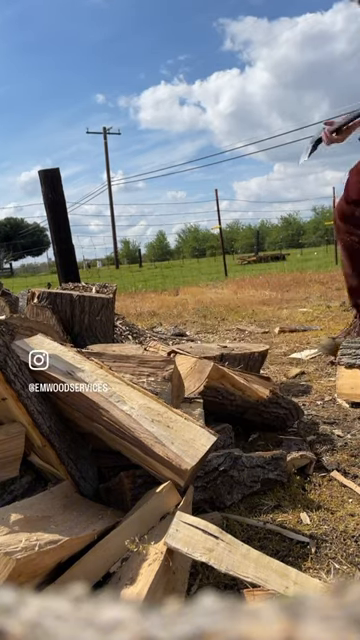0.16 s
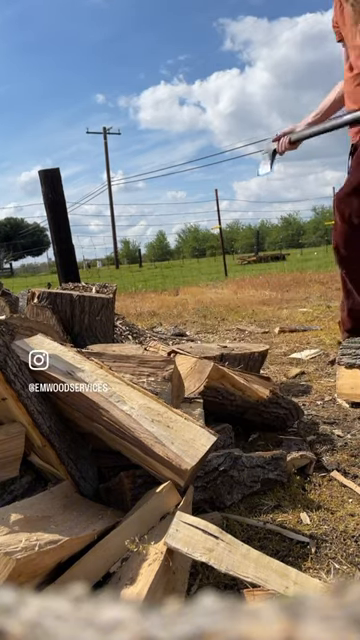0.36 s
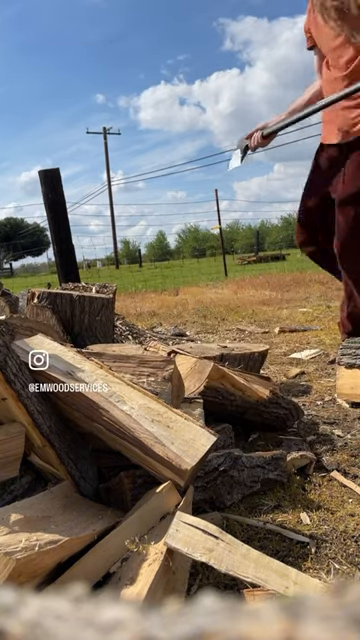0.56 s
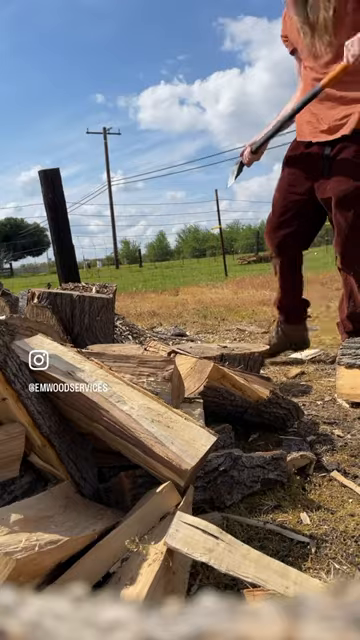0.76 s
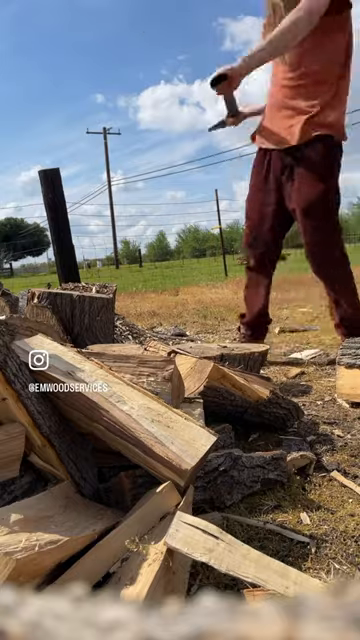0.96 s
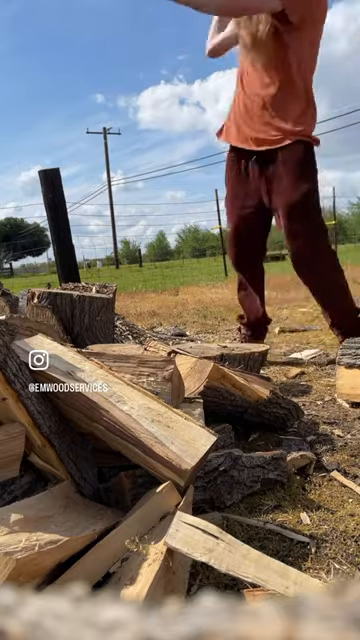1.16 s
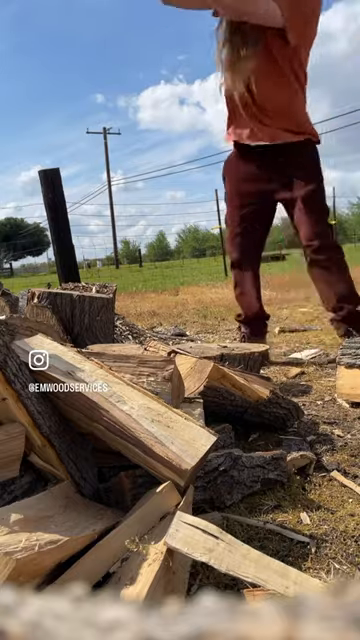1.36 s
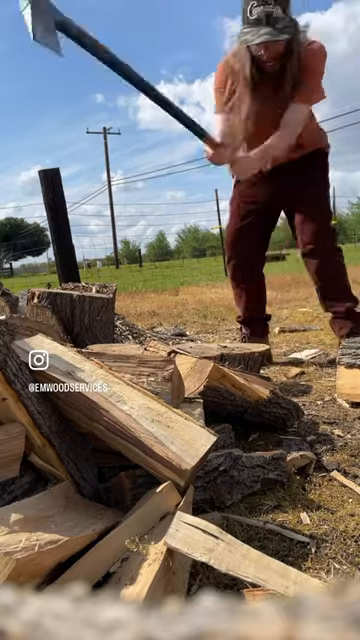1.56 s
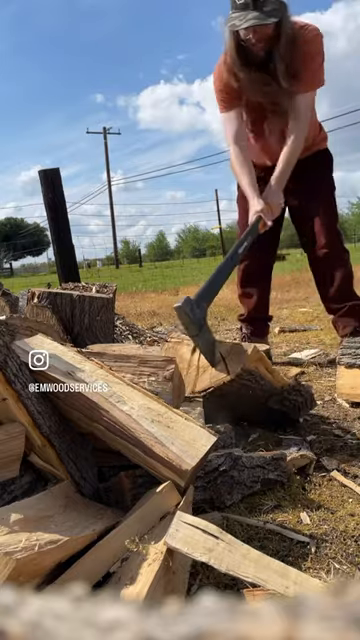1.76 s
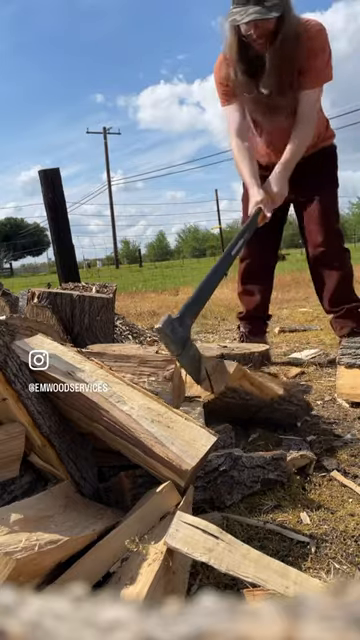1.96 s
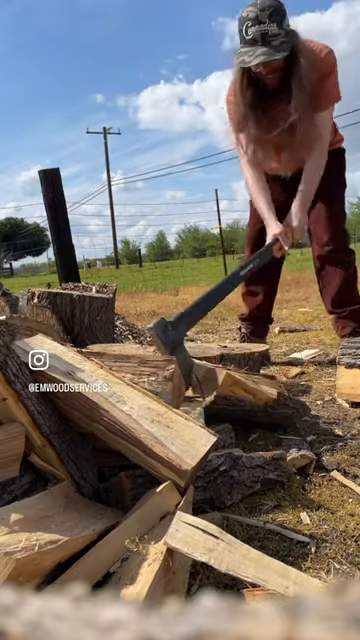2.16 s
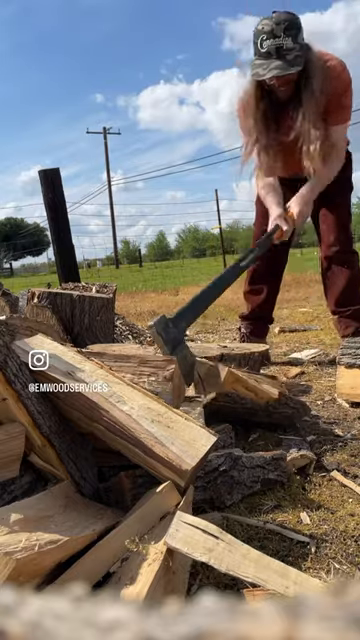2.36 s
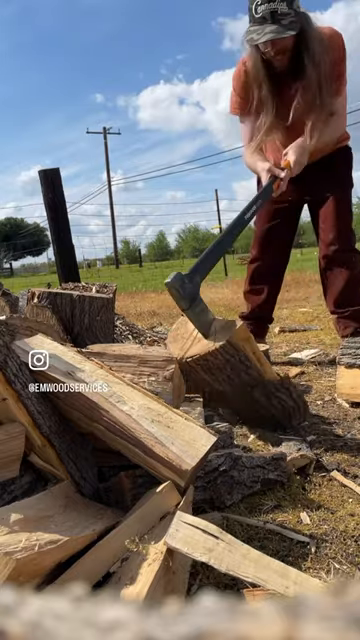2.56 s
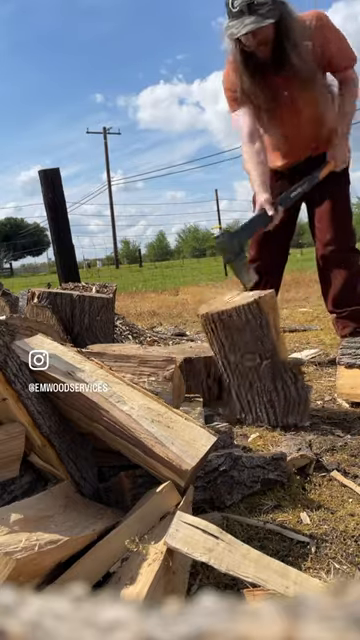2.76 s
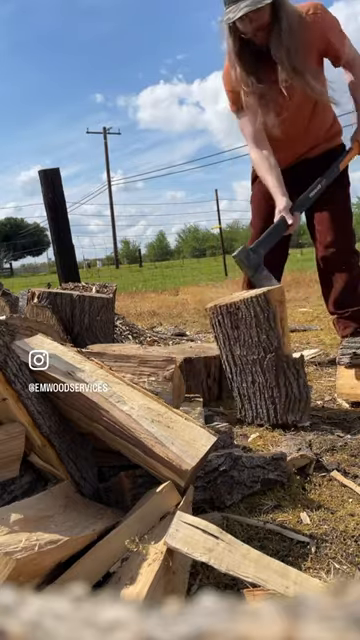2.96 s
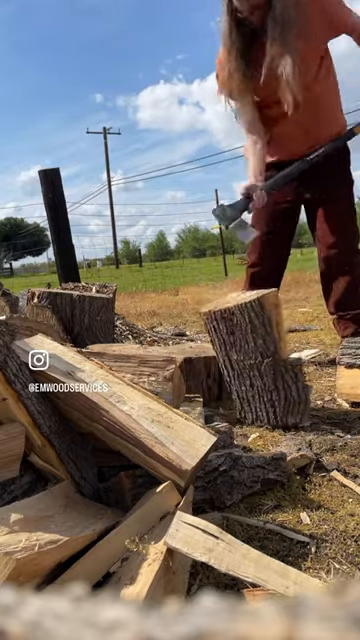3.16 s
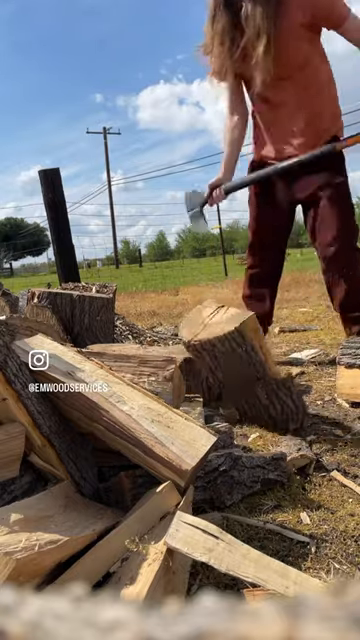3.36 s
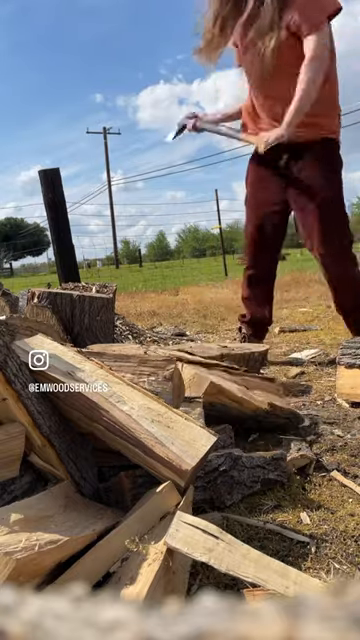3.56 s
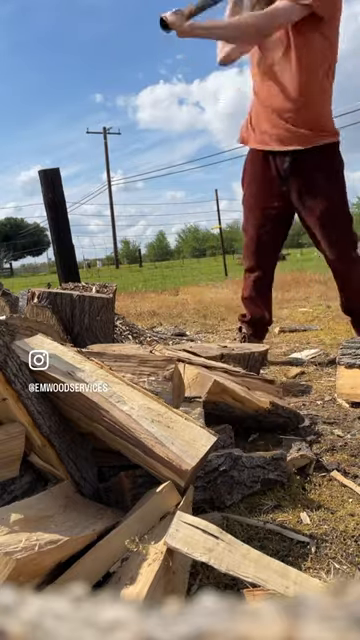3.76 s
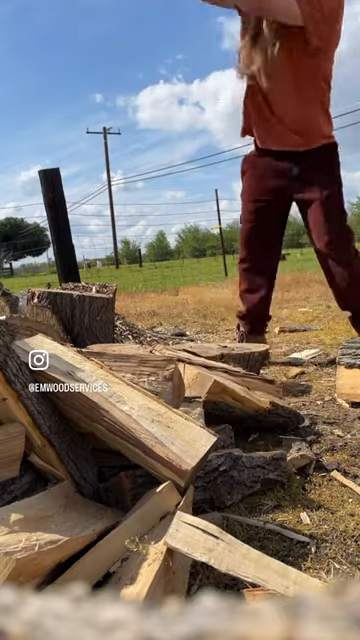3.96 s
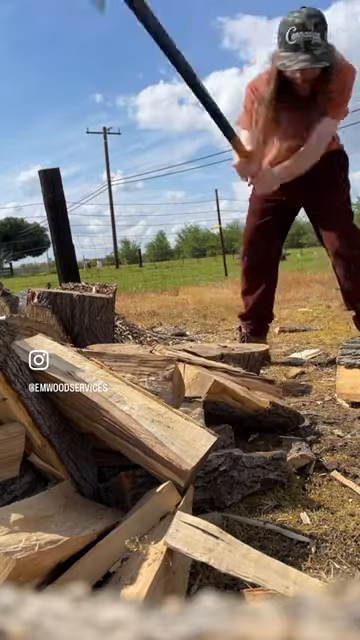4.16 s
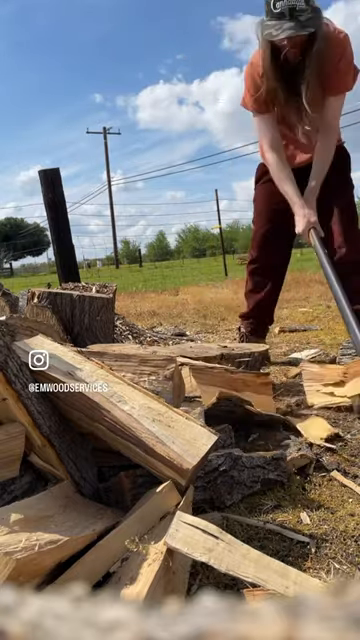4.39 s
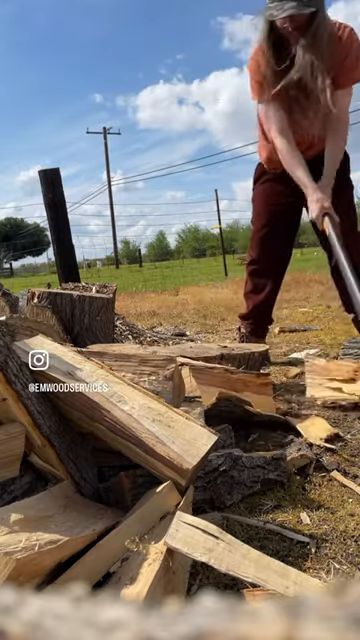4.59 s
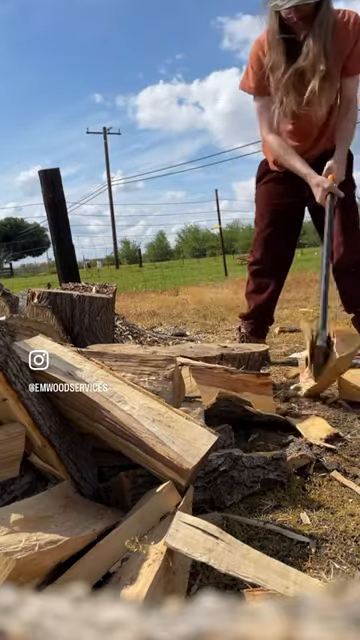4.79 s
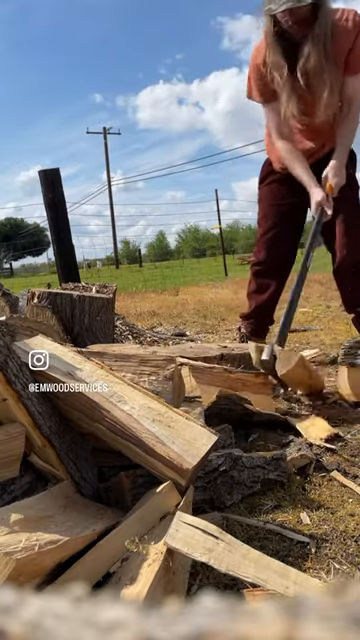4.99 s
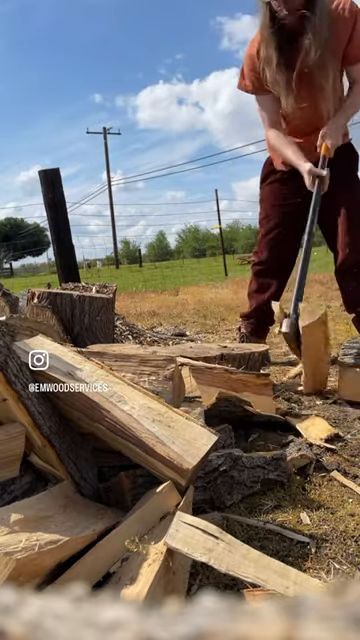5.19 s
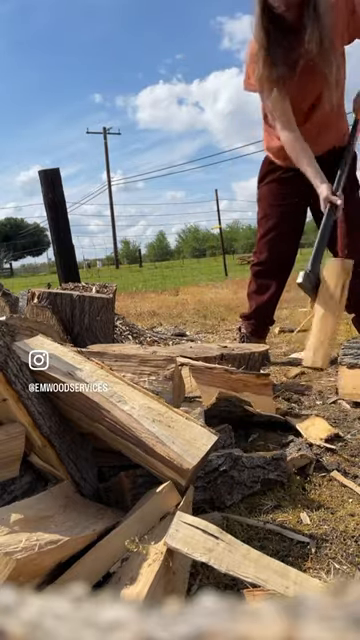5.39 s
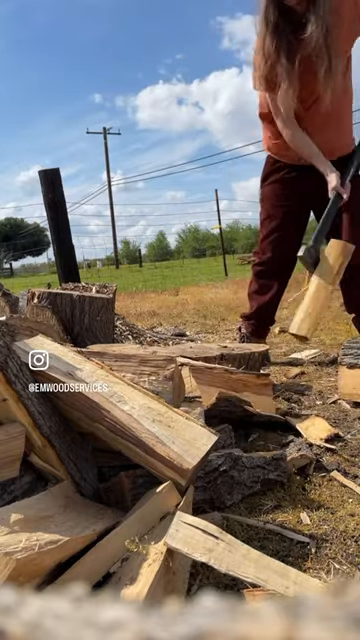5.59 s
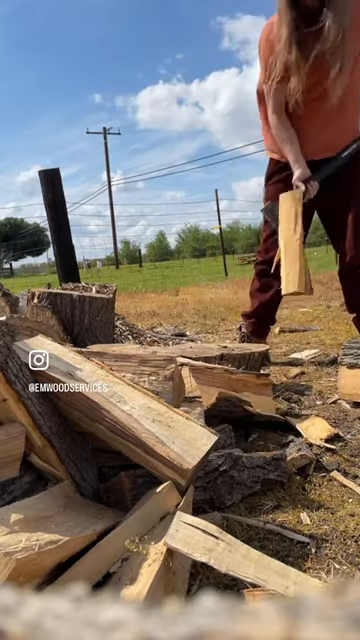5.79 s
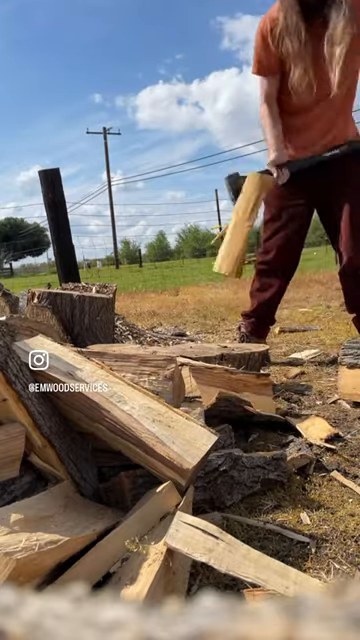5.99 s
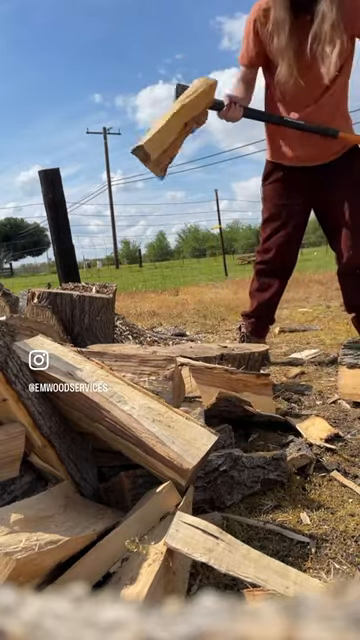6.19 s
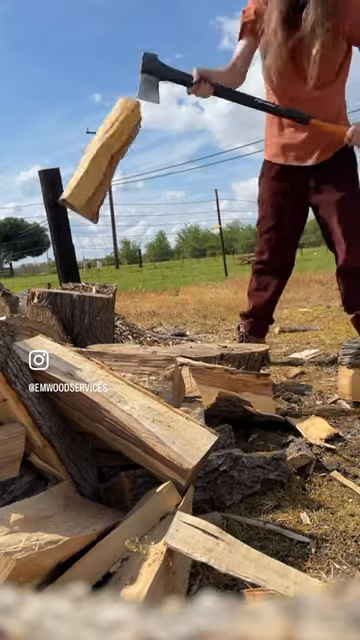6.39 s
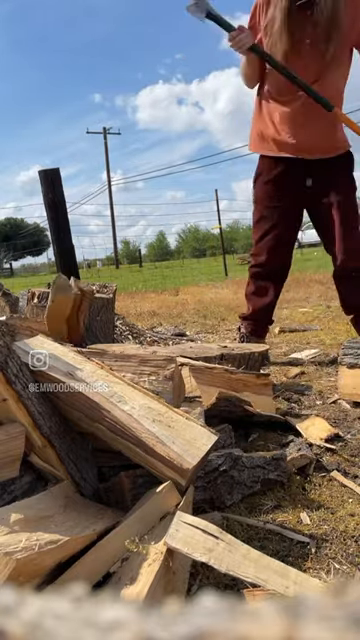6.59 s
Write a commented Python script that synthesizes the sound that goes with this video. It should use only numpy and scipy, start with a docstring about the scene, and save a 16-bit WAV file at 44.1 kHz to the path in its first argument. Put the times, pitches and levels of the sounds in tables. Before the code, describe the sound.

An axe cracks wooden rounds close by in an open field while a heavy vehicle's low rumble swells and passes behind.

```python
"""An axe splits wood rounds in an open field, close to a two-port microphone: bursts of fibre snaps
drive the modes of the wood, with body thumps, tears, knocks, dry tocks and squeaks around them.
Some way off a heavy vehicle revs up and rumbles past: bands of noise, engine orders and a gear whine.
Cloth swishes as shaped noise, a small bird warbles in gliding sines; air hiss and a field murmur lie behind.
"""
import sys
import numpy as np
from scipy import signal
from scipy.io import wavfile

SR = 44100
rng = np.random.default_rng(int(sys.argv[2]) if len(sys.argv) > 2 else 0)


def boost_factor(decibels):
    """Convert a level in decibels to a linear amplitude factor."""
    exponent = np.asarray(decibels, float) / 20
    return 10 ** exponent


def digitize_waveform(pressure):
    """Quantize a signal to 16-bit integers and store it at the path in sys.argv[1].

    Rows of a 2-D input are taken as channels; values are limited to [-1, 1].
    """
    field = np.atleast_2d(pressure).T
    bounded = np.clip(field, -1, 1)
    quanta = np.round(bounded * 32767).astype(np.int16)
    wavfile.write(sys.argv[1], SR, quanta)


N = 292734
SIDES = np.array([[1], [-1]])   # left, right
SNAP_FROM_HZ = 4200   # sharp snaps of the wood and fine hiss of the air lie above this

# likeness of the two ports in air hiss and cloth, held within -1 to 1: (frequency [Hz], likeness)
AIR_LIKENESS = [(1000, 0.59), (3300, -0.1), (5500, 0.55), (6600, 0.19), (7200, -1.8), (8200, -1.51),
                (9000, 0.25)]
# nearly centred balance of the diffuse sounds: (frequency [Hz], left over right [dB])
CENTRED = [(30, 0.04), (9000, 0.025)]


def rms_one(x):
    """Scale to unit rms."""
    return x / np.sqrt(np.mean(x ** 2) + 1e-20)


def in_time(rows):
    """Each column of a curve table, sample by sample."""
    s, *columns = np.transpose(rows)
    return [np.interp(np.arange(N) / SR, s, c) for c in columns]


def at_hz(points, hz):
    """Read a spectrum on a log-frequency axis."""
    return np.interp(np.log(hz), np.log(np.array(points)[:, 0]), np.array(points)[:, 1])


def drift(rate):
    """Slow random wander of unit rms: twice-smoothed noise on every 40th sample, joined by lines."""
    r = np.exp(-80 * np.pi * rate / SR)
    white = rng.standard_normal(N // 40 + 2002)
    slow = signal.lfilter([1], [1, -2 * r, r * r], white)[2000:]
    return np.interp(np.arange(N) / 40, np.arange(len(slow)), rms_one(slow))


def ring(drive, hz, t60):
    """A damped resonance: a unit click sets a sine of height 1 ringing."""
    r, w = boost_factor(-60 / (t60 * SR)), 2 * np.pi * hz / SR
    return signal.lfilter([0, np.sin(w)], [1, -2 * r * np.cos(w), r * r], drive + 1e-18)


def turbulence(colour, splits_hz, likeness, balance, patchy_db, flicker_per_s, edges):
    """Bands of flickering stereo noise, summed between the splits, each part rms 1."""
    parts = np.zeros((len(splits_hz) + 1, 2, N))
    together = drift(flicker_per_s)
    white = rng.standard_normal((2, 2, N))      # neighbouring bands get unrelated noise
    for k, (low, high) in enumerate(zip(edges, edges[1:])):
        band = signal.butter(2, [low, high], "band", fs=SR, output="sos")
        mid, side = signal.sosfilt(band, white[k % 2])
        hz = np.sqrt(low * high)
        alike = np.clip(at_hz(likeness, hz), -1, 1)
        pair = np.sqrt(1 + alike) * mid + np.sqrt(1 - alike) * side * SIDES
        flicker_db = patchy_db * (0.89 * together + drift(flicker_per_s))
        gain = boost_factor(at_hz(colour, hz) + flicker_db)
        parts[np.searchsorted(splits_hz, hz)] += gain * pair * boost_factor(at_hz(balance, hz) / 2 * SIDES)
    return [rms_one(p) for p in parts]


def harmonics(curve, orders, waver_db):
    """Sines on multiples of a moving rate, each wavering in level."""
    hz, db = in_time(curve)
    turns = np.cumsum(hz * (1 + .004 * drift(8.0))) / SR      # the speed hunts a little
    stack = np.zeros(N)
    for k, order_db in orders:
        level = boost_factor(order_db + waver_db * drift(20.5))
        stack += level * np.sin(2 * np.pi * (k * turns + rng.random()))
    return np.sqrt(2) * boost_factor(db) * stack


def glides(notes):
    """Near-sine notes that leave their first pitch slowly, with soft edges and a fluttering level."""
    out, t = np.zeros(N), np.arange(N) / SR
    flutter = boost_factor(2.2 * drift(80))
    wobble_hz = 30 * drift(150)   # the pitch is not steady
    for s, length_s, from_hz, to_hz, db in notes:
        done = np.clip((t - s) / length_s, 0, 1)
        hz = from_hz + (to_hz - from_hz) * done ** 1.6 + wobble_hz
        envelope = np.abs(np.sin(np.pi * done)) ** .5 * (done < 1)
        out += np.sqrt(2) * boost_factor(db) * envelope * np.sin(2 * np.pi * np.cumsum(hz) / SR)
    return out * flutter * boost_factor(.6 * SIDES)


def contacts():
    """Every crack: each heavy blow, three tears that weaken on average, then the single knocks."""
    # heavy blows: (time [s], level [dB], thud [dB rel], snap [dB rel], favoured ring [Hz],
    # fading of the tears [dB/s], favoured thud [Hz])
    blows = [(1.491, -6.5, 9, -3, 1649, 500, 564), (3.3872, -17, 6, -8, 1377, 303, 865),
             (4.095, -4, 3, -1, 4460, 295, 1060), (6.505, -5, 1, -7.5, 1805, 498, 985)]
    # single knocks, scuffs and splinter ticks: (time [s], level [dB], thud [dB rel], snap [dB rel],
    # favoured ring [Hz], t60 [s], held to 6-70 ms when played)
    knocks = [(0.1472, -58, 29, -17, 1970, 0.0056), (0.2149, -40.5, 7.5, -6, 2170, 0.084),
              (1.2444, -48.5, 6, 28, 4500, 0.01), (1.514, -30, 18, -19, 2400, 0.028),
              (1.601, -33, -15, -12, 2250, .012), (1.712, -38, 0, 3, 1400, .011),
              (1.8144, -33.5, 6, -1, 1535, 0.01), (1.8663, -27, -9, -12, 2610, 0.05),
              (1.8863, -27, 3.5, -8, 1630, 0.078), (1.9494, -37.5, 12, 5, 5300, 0.015),
              (1.97, -40, -4, -6, 3000, 0.046), (2.165, -33, -5, -8, 2050, 0.043),
              (2.4236, -43, 25, -22, 2028, 0.01185), (3.3756, -29, -9, -13, 1659, 0.07),
              (4.101, -21, 16, -16, 2080, 0.047), (4.114, -23.5, -10, 7, 4500, 0.007),
              (4.122, -25.5, 0, -1, 3000, 0.037), (4.131, -22, 2, 0, 3720, 0.018),
              (4.143, -22.5, -16, 7, 4300, 0.014), (4.156, -28.5, -13, -5, 3500, 0.02),
              (4.1627, -27, -12, 5, 3400, 0.012), (4.195, -19.5, -16, 2.5, 3960, 0.0084),
              (4.211, -43, 26, -13, 1600, 0.011), (4.2493, -38.5, 22, -4, 1750, 0.034),
              (4.302, -21, 7, 0.5, 1560, 0.02), (4.4223, -27, -4, -27, 2160, 0.01),
              (4.828, -39, -3, 4, 1599, 0.028), (4.8787, -26, 23, 7, 2630, 0.0057),
              (6.206, -24.5, -1, -3, 2010, 0.077), (6.236, -18, 4, -17, 1700, 0.0091),
              (6.2552, -17.5, 1, -15, 2280, 0.0042), (6.332, -29, 0, -6, 2300, .07),
              (6.361, -24, 5, -12, 2000, .02), (6.478, -10, -11, -2.5, 3280, 0.013),
              (6.483, -23, -5, -19, 2830, 0.069), (6.501, -22, -10, 3, 3500, 0.016)]
    crack_s, tear_s, first_loss_db, knock_thud_hz = 0.026, 0.019, 10, 700
    rows = []
    for s, level_db, thud_db, snap_db, ring_hz, fade_db, thud_hz in blows:
        rows.append((s, level_db, thud_db, snap_db, ring_hz, crack_s, thud_hz))
        for after in .0095 * np.arange(1, 4):
            tear_db = level_db - first_loss_db - fade_db * after + 3.1 * rng.standard_normal()
            tear_thud_db, tear_snap_db = thud_db - 3.5 - 76.0 * after, snap_db - 53.0 * after
            rows.append((s + after, tear_db, tear_thud_db, tear_snap_db, ring_hz, tear_s, thud_hz))
    rows += [(*row, knock_thud_hz) for row in knocks]
    # a side for each: a little to the left on average, scattered (left over right, dB)
    return [(*row, 1 + 4 * rng.standard_normal()) for row in rows]


def wood():
    """Each contact is a dying burst of fibre snaps that drives the modes of the wood."""
    # modes of the wood: (frequency [Hz], level [dB], t60 [s])
    modes = [(300, -14, .025), (390, -13, .02), (470, -8, .018), (545, -2, .032), (660, -2, .018),
             (770, -5, .014), (900, -6, .012), (1050, -2, .013), (1250, -9, .009), (1420, -6, .008),
             (1620, -8, .007), (1950, 0, .009), (2300, -2, .006), (2640, -3, .006), (2930, 0, .008),
             (3350, -2, .005), (3750, -3, .005), (4100, -3, .004), (4600, -2, .004), (5000, -2, .004),
             (5450, 2, .004), (6000, -1, .003), (6500, -3, .003), (7300, -8, .004), (8000, -9, .004),
             (8700, -10, .004), (9400, -9, .004)]
    thud_top_hz = 1300
    no_bass = signal.butter(2, thud_top_hz, "high", fs=SR, output="sos")
    out, size = np.zeros((2, N)), SR // 5
    t = np.arange(size) / SR
    for s, level_db, thud_db, snap_db, ring_hz, t60, thud_hz, pan_db in contacts():
        tearing_s = np.clip(t60, .006, .07)
        snaps = (rng.random(size) < 9000 / SR) * boost_factor(6.6 * np.minimum(rng.exponential(1, size), 3))
        snaps = snaps * rng.choice([-1, 1], size)
        snaps[20] = 8.9      # the first contact is one hard click
        drive = snaps * boost_factor(-60 * (t / tearing_s) ** 2.76)
        # the mass of the round answers to a softer contact
        push = signal.lfilter([.1], [1, -.9], drive * boost_factor(-60 * t / 0.035))
        strengths_db = rng.normal(0, 1.5, (len(modes), 2))
        groups = np.zeros((3, 2, size))      # thud, ring, snap
        for (hz, db, mode_t60), chance_db in zip(modes, strengths_db):
            push = -push      # neighbouring low modes swing in opposite phase
            group = 0 if hz < thud_top_hz else 2 if hz > SNAP_FROM_HZ else 1
            # the spot struck favours one ring, most in a short knock, and one low note
            favour_db = (17 if t60 < .018 else 10) * np.exp(-(np.log2(hz / ring_hz) / .45) ** 2)
            favour_db += 7 * np.exp(-(np.log2(hz / thud_hz) / .5) ** 2)
            note = ring(drive if group else push, hz, mode_t60)
            groups[group] += boost_factor(db + favour_db) * boost_factor(chance_db)[:, None] * note
        groups[1:] = signal.sosfilt(no_bass, groups[1:])   # small modes radiate no bass
        # energy follows the length of the tearing
        energy = (groups ** 2).sum(axis=(1, 2))
        height = np.sqrt(energy / (tearing_s + 0.0081) / SR * 12)
        blow = np.tensordot(boost_factor([thud_db, 0, snap_db]) / height, groups, 1)
        at = round(s * SR)
        out[:, at:at + size] += (boost_factor(level_db - 2.5 + pan_db / 2 * SIDES) * blow)[:, :N - at]
    return out


def thumps():
    """Under the heavy blows a soft push sets two close body notes of the round ringing."""
    # body notes: (time [s], level [dB], frequency [Hz], t60 [s])
    body = [(1.499, -20, 290, .09), (3.391, -14, 400, .04), (4.097, -10, 500, .025),
            (4.0995, -4, 320, .022), (6.4965, -6, 175, .05), (6.508, -11, 620, .025), (6.514, -9, 240, .04)]
    upper_ratio, upper_db, contact_s = 1.1, -3.5, 0.0013
    out, width = np.zeros(N), round(contact_s * SR)
    for s, db, hz, t60 in body:
        push = np.zeros(N)
        push[round(s * SR):][:width] = boost_factor(db) * np.hanning(width) / width * 2
        out += ring(push, hz, t60) - boost_factor(upper_db) * ring(push, hz * upper_ratio, t60)
    return out


def tocks(modes, hits):
    """Four quick touches set the modes of a loose dry piece ringing."""
    drive = np.zeros(N)
    for s, db, contact_s in hits:
        touches_s = s + contact_s * np.array([0, .35, .7, 1]) * rng.uniform(.85, 1.15, 4)
        heights = boost_factor(db - 6 + rng.normal(0, 1.5, 4)) * [1, .3, -.3, .2]
        drive[(touches_s * SR).astype(int)] = heights
    rings = np.zeros(N)
    for k, (hz, db, t60) in enumerate(modes):
        rings += (-1) ** k * boost_factor(db) * ring(drive, hz, t60)
    band = signal.butter(3, [1750, 6000], "band", fs=SR, output="sos")
    return signal.sosfilt(band, rings) * boost_factor(.5 * SIDES)


def billet():
    """A dry billet gives a pitched tock."""
    # its modes: (frequency [Hz], level [dB], t60 [s])
    billet_modes = [(1950, 1, .016), (2280, -4, .01), (2930, 1, .014), (3680, -6, .02), (4020, -11, .014),
                    (4700, -14, .008), (5520, -19, .01)]
    # its tocks: (time [s], level [dB], nominal contact [s])
    billet_hits = [(6.4751, -0.15, 0.001945)]
    return tocks(billet_modes, billet_hits)


def splinter():
    """A thin splinter gives a brighter tock."""
    # its modes: (frequency [Hz], level [dB], t60 [s])
    splinter_modes = [(2280, -7, 0.026), (2700, -6.5, 0.023), (3330, -0.5, 0.017), (3800, -3, 0.017),
                      (5360, 2.5, 0.01), (6160, -2, .012), (6400, -7, .014)]
    # its tocks: (time [s], level [dB], nominal contact [s])
    splinter_hits = [(4.825, -11.5, 0.0044)]
    return tocks(splinter_modes, splinter_hits)


def squeaks():
    """Short falling squeaks as the blade works loose in the wood."""
    # squeaks: (start [s], length [s], from [Hz], to [Hz], level [dB])
    squeak_notes = [(1.599, 0.012, 2300, 2230, -43), (1.66, 0.029, 1755, 1690, -44)]
    return glides(squeak_notes)


def echoes(x):
    """Two dull returns from the wood pile and the ground, with the sides swapped."""
    dull = signal.lfilter([.4], [1, -.6], x)
    out = np.zeros_like(x)
    for lag_s, db in [(.0045, -42), (.012, -29)]:
        lag = round(lag_s * SR)
        out[:, lag:] += boost_factor(db) * dull[::-1, :-lag]
    return out


def ports(x):
    """The right port turns the phase through a full cycle around 7.8 kHz, opposing the left there."""
    band = signal.lfilter(*signal.iirpeak(7800, 2.6, fs=SR), x[1])
    return np.array([x[0], x[1] - 2 * band])


def road_levels():
    """Gains of rumble, roar, tyre rush and its top: the pass, the booms and chance lumps."""
    # the vehicle nears and passes: (time [s], rumble [dB], roar [dB], tyre rush [dB])
    passing = [(0.0, -43, -45.5, -45.5), (0.4, -30.5, -41.5, -46), (0.65, -32.5, -40.5, -42.5),
               (0.87, -26, -35, -38), (1.3, -23.5, -36, -40), (1.7, -24.5, -31.5, -37.5),
               (2.1, -21.5, -29, -34), (2.5, -19.5, -27, -33.5), (2.95, -21.5, -28.5, -33),
               (3.4, -20.5, -24.5, -28.5), (3.9, -17, -24.5, -28), (4.45, -14.5, -16.5, -21),
               (4.75, -15.5, -17.5, -22), (5.1, -12.5, -15, -17.5), (5.75, -12.5, -18, -20.5),
               (5.95, -14.5, -22.5, -27), (6.4, -15.5, -18.5, -27), (6.64, -16.5, -23, -27.5)]
    # top of the tyre rush: (time [s], level [dB])
    rush_top = [(0.0, -53), (0.63, -50), (1.0, -45), (1.79, -42.5), (1.98, -40.5), (3.27, -41.5),
                (3.9, -35.5), (4.31, -31.5), (4.59, -33), (5.42, -34.5), (5.67, -29), (5.88, -34),
                (6.32, -35), (6.64, -32.5)]
    # booms: (middle [s], half length [s], rumble rise [dB], roar rise [dB]), negative = fall
    booms = [(2.05, 0.023, 8.5, -2), (2.429, 0.027, 7.5, 6.5), (3.399, 0.0097, 15.5, 15.5),
             (3.559, 0.04, 4.5, -1), (3.711, 0.018, 6, 4), (4.053, 0.036, 5.5, 5.5), (4.319, 0.015, 9.5, 8),
             (4.501, 0.019, 11, 4.5), (4.582, 0.018, 11.5, -3), (4.844, 0.028, -6, 2.5),
             (5.067, 0.024, 6.5, 1.5), (6.057, 0.037, 0, 2.5), (6.501, 0.043, 0, 1.5)]
    rumble_db, roar_db, rush_db = in_time(passing)
    t, lumps_db = np.arange(N) / SR, 1.3 * drift(7.0)
    for s, half, rumble_rise_db, roar_rise_db in booms:
        swell = np.exp(-((t - s) / half) ** 2)
        rumble_db = rumble_db + rumble_rise_db * swell
        roar_db = roar_db + roar_rise_db * swell
    return boost_factor([rumble_db + lumps_db, roar_db + 1.05 * lumps_db, rush_db, in_time(rush_top)[0]])


def road():
    """Lumpy road noise in four bands, with a hollow band of narrow noise on a moving centre."""
    # spectrum: (frequency [Hz], density [dB per Hz])
    road_colour = [(25, -16), (53, -1.5), (103, 0.0), (177, -9), (235, -7), (318, -12.5), (600, -12),
                   (790, -18), (1030, -18.5), (1250, -38), (1900, -44)]
    # likeness of the two ports: (frequency [Hz], likeness)
    road_likeness = [(60, 0.87), (140, 0.67), (330, 1), (600, 0.46), (900, 0.72), (1860, 0.3)]
    # balance: (frequency [Hz], left over right [dB])
    road_balance = [(60, -0.5), (140, -2), (330, -3), (790, -3.5), (1860, 6.5), (4400, -7.5), (10400, 1.5)]
    # borders of rumble, roar, tyre rush and its top: frequency [Hz]
    road_splits = [210, 500, 860]
    # hollow band: (time [s], centre [Hz], level relative to the tyre rush [dB])
    hollow_curve = [(0, 725.3, -26), (2.0, 753, -12.5), (3.8, 795.6, -3.5), (4.3, 710.6, -8.5),
                    (5.2, 739, -8.5), (5.6, 699, -3), (6.2, 685, -5.5), (6.64, 666, -6)]
    levels = road_levels()
    parts = turbulence(road_colour, road_splits, road_likeness, road_balance,
                       1.37, 9.4, np.geomspace(27, 1900, 17))
    centre_hz, hollow_db = in_time(hollow_curve)
    turn = 2 * np.pi * np.cumsum(centre_hz) / SR
    hollow = boost_factor(hollow_db) * (drift(43.0) * np.cos(turn) + drift(38.0) * np.sin(turn))
    out = sum(g * p for g, p in zip(levels, parts)) + levels[2] * hollow * boost_factor([[-2.5], [1.5]])
    out[0] = np.roll(out[0], round(.00025 * SR))   # it reaches the left port a little late
    return out


def engine():
    """Low engine orders: sines on multiples of the firing rate."""
    # firing: (time [s], rate [Hz], level [dB])
    firing = [(0, 37.51, -33), (.6, 37.13, -39.5), (1.05, 42.57, -30), (1.5, 44.67, -25), (1.7, 43.8, -43),
              (2.05, 40.57, -38), (3.3, 41.2, -29.5), (4.05, 40.15, -27.5), (4.7, 43.96, -19),
              (5.3, 43.36, -24.5), (5.9, 41.97, -33), (6.64, 41.1, -28)]
    # orders: (multiple, level [dB])
    firing_orders = [(1, -1.5), (2, 0), (3, -4), (4, -8)]
    return harmonics(firing, firing_orders, waver_db=0.5)


def gear_whine():
    """A thin whine from the left: sines on multiples of the gear mesh rate."""
    # mesh: (time [s], rate [Hz], level [dB])
    mesh = [(0, 148, -55), (.7, 148, -56), (.94, 173, -50), (1.6, 178, -50), (1.9, 185.5, -47),
            (2.3, 186.5, -43), (3.2, 186.3, -47), (4.1, 186, -43), (5.1, 184, -42), (5.6, 180, -42),
            (6.64, 178, -43)]
    # orders: (multiple, level [dB])
    mesh_orders = [(1, 3), (2, -1), (3, 0), (4, -8), (5, -8), (6, -13), (7, -16), (8, -15), (9, -21),
                   (11, -16), (12, -23), (14, -17)]
    return harmonics(mesh, mesh_orders, waver_db=4.5) * boost_factor([[3], [-5]])


def dips():
    """Brief level changes set just after three blows: a fast change, a hold and a slower return."""
    # dips: (time [s], depth [dB], hold [s]), negative depth = a rise
    dip_rows = [(1.5, 1.5, 0.12), (3.45, -1.5, 0.043), (4.108, 11, 0.14)]
    fall_s, return_s = 0.0038, 0.18
    t, depth_db = np.arange(N) / SR, np.zeros(N)
    for s, db, low_s in dip_rows:
        depth_db += db * np.interp(t - s, np.cumsum([0, fall_s, low_s, return_s]), [0, 1, 1, 0])
    return boost_factor(-depth_db)


def vehicle():
    """The heavy vehicle some way off: road noise, engine and whine share the brief level dips."""
    return (road() + engine() + gear_whine()) * dips()


def cloth():
    """Swishes of cloth and of hands on the handle: noise under smooth swells."""
    # swishes: (middle [s], half length [s], level [dB])
    swishes = [(0.222, 0.072, -66), (0.768, 0.038, -61), (1.144, 0.08, -48), (1.25, 0.044, -44.5),
               (1.89, 0.085, -56), (2.568, 0.11, -51), (2.99, 0.045, -56.5), (3.418, 0.03, -46.5),
               (3.825, 0.094, -45), (4.1, 0.014, -32), (5.24, 0.1, -46), (5.444, 0.032, -43.5),
               (5.657, 0.055, -69), (6.22, 0.043, -48)]
    # spectrum: (frequency [Hz], density [dB per Hz])
    cloth_colour = [(2500, -11.5), (4900, 4), (6500, -1), (7600, -42), (9200, 9.5), (10200, -17.5)]
    t = np.arange(N) / SR
    sweep = sum(boost_factor(db) * np.exp(-((t - s) / half) ** 2) for s, half, db in swishes)
    noise, = turbulence(cloth_colour, [], AIR_LIKENESS, CENTRED, 2.2, 40.0, np.geomspace(2200, 10200, 12))
    return sweep * noise


def bird():
    """A small bird's gliding notes, blurred by returns from the trees with the sides swapped."""
    # notes: (start [s], length [s], from [Hz], to [Hz], level [dB])
    bird_notes = [(.066, .032, 3350, 4000, -58), (.172, .028, 3350, 3750, -56),
                  (.265, .022, 3600, 3300, -56), (.274, .032, 4150, 3750, -56),
                  (.338, .028, 2950, 3300, -54), (.366, .012, 3150, 2800, -59),
                  (.445, .042, 3000, 3750, -55.5), (.528, .022, 3200, 2700, -58),
                  (.568, .04, 2800, 3600, -54), (.61, .038, 3400, 2500, -60), (.65, .025, 4250, 3950, -61),
                  (.735, .02, 3800, 3100, -60), (.755, .025, 3700, 3480, -57),
                  (.875, .048, 3460, 2700, -54.5), (.975, .035, 2900, 3700, -53)]
    # returns from the trees: (lag [s], level [dB])
    tree_returns = [(.009, -15), (.02, -18)]
    song = glides(bird_notes)
    returns = sum(boost_factor(db) * np.roll(song[::-1], round(lag_s * SR), axis=1) for lag_s, db in tree_returns)
    return song + returns


def air_hiss():
    """Air and grass hiss: flickering noise in two parts, each following its own level."""
    # levels: (time [s], hiss 1.3-4 kHz [dB], fine hiss above [dB])
    hiss_levels = [(0.0, -56, -62), (0.25, -48.5, -63), (0.45, -61, -68.5), (0.8, -47.5, -57.5),
                   (1.25, -46.5, -51.5), (1.8, -44.5, -52), (2.3, -45, -55), (3.3, -45, -54.5),
                   (3.7, -44.5, -50.5), (4.68, -38, -45), (5.3, -37.5, -42), (5.64, -37, -42.5),
                   (6.08, -38.5, -44.5), (6.34, -34, -41.5), (6.64, -35, -45)]
    # spectrum: (frequency [Hz], density [dB per Hz])
    hiss_colour = [(740, -31), (1250, 0), (1670, -2.5), (2080, -2.5), (2460, -4.5), (6070, -12),
                   (7050, -11.5), (9260, -27.5), (9680, -15.5), (10200, -43), (13300, -73), (22000, -120)]
    hiss_db, fine_db = in_time(hiss_levels)
    hiss, fine = turbulence(hiss_colour, [SNAP_FROM_HZ], AIR_LIKENESS, CENTRED,
                            1.62, 22.0, np.geomspace(1250, 10200, 16))
    return boost_factor(hiss_db) * hiss + boost_factor(fine_db) * fine


def field_murmur():
    """Diffuse murmur of the field from all sides: noise almost unrelated between the ports."""
    # spectrum: (frequency [Hz], density [dB per Hz])
    field_colour = [(15, -29), (25, 5), (43, 8), (54, -29), (141, -0.5), (1490, -72.5), (3080, -58.5),
                    (3670, -68.5), (10000, -90.5), (13000, -101), (22000, -120)]
    unrelated = [(30, 0.42), (60, 0.16), (300, .05), (9000, .05)]   # (frequency [Hz], likeness)
    murmur, = turbulence(field_colour, [], unrelated, CENTRED, 1.0, 8.2, np.geomspace(22, 10000, 15))
    return boost_factor(-28) * murmur


def scene():
    """Everything heard at the microphone; wood and bird share the echoes and the port phase."""
    close = wood() + thumps() + billet() + splinter() + squeaks() + bird()
    return ports(close + echoes(close)) + vehicle() + cloth() + air_hiss() + field_murmur()


def band_limit(x):
    """A steep low-pass at the top of the band."""
    return signal.sosfilt(signal.butter(12, 10980, fs=SR, output="sos"), x)


def record(dry):
    """The microphone's deepest bass is lost, peaks are rounded and the top is cut."""
    thin = signal.sosfilt(signal.butter(4, 31, "high", fs=SR, output="sos"), dry)
    rounded = .98 * np.tanh(thin / .98)
    cut = signal.sosfilt(signal.cheby2(12, 60, 11200, fs=SR, output="sos"), rounded)
    return band_limit(cut)


dry = scene()
out = record(dry)
digitize_waveform(out)
```